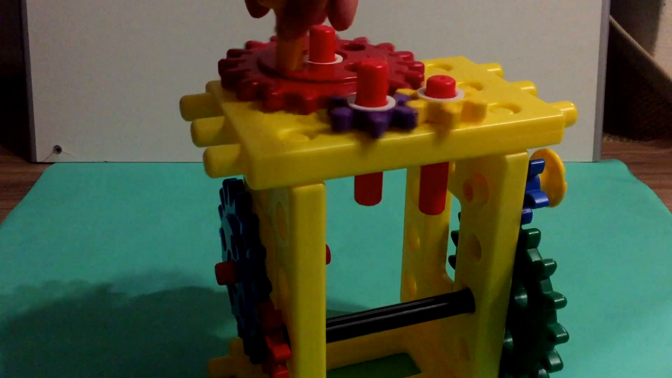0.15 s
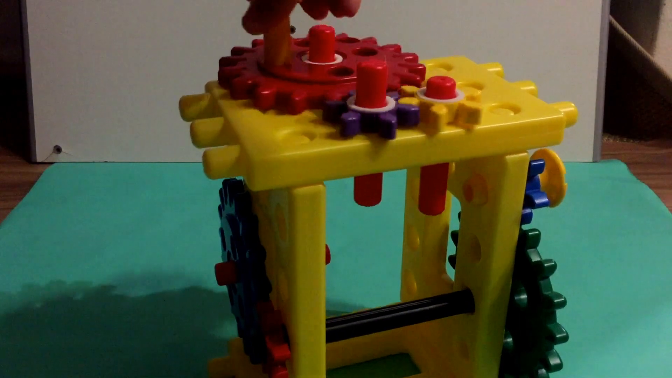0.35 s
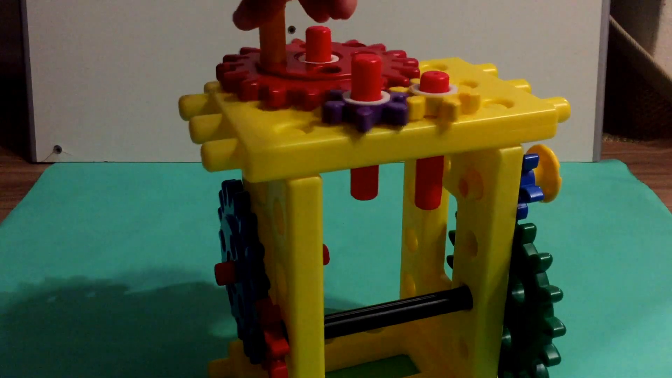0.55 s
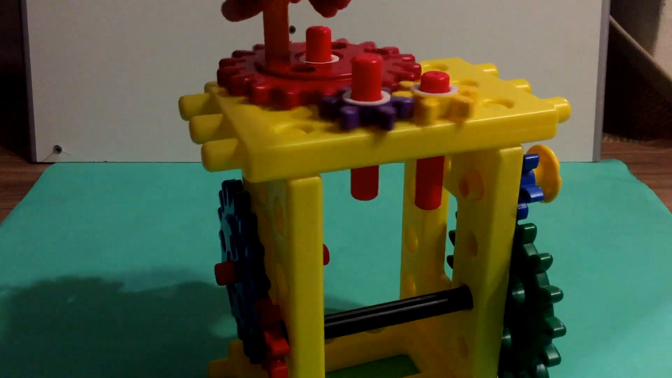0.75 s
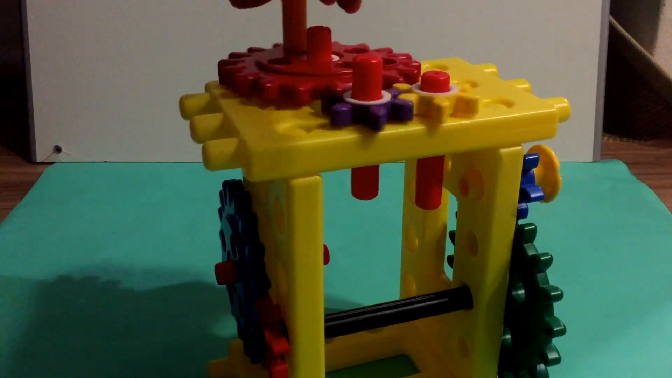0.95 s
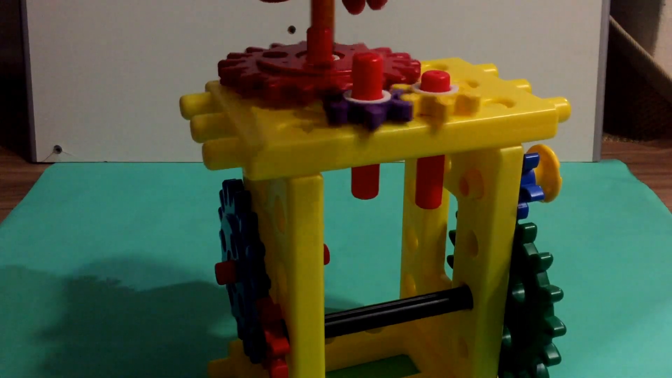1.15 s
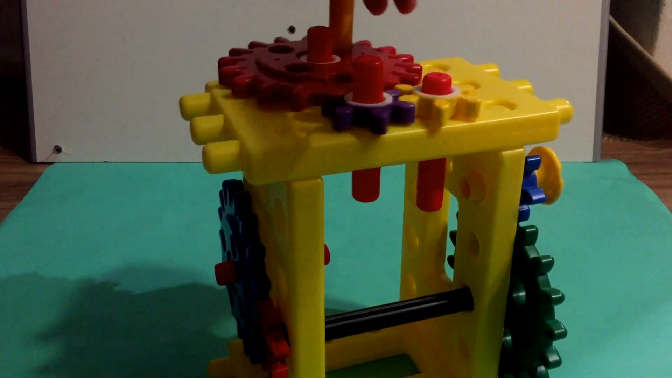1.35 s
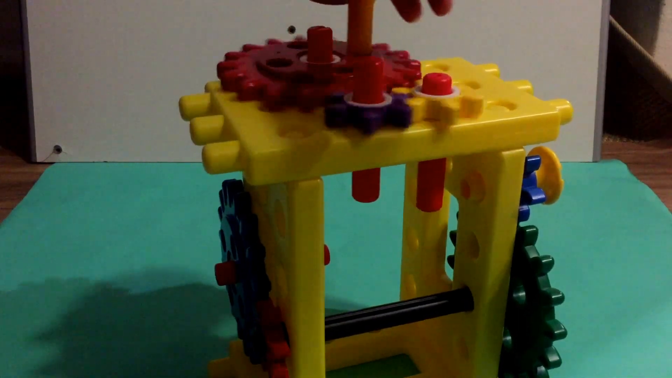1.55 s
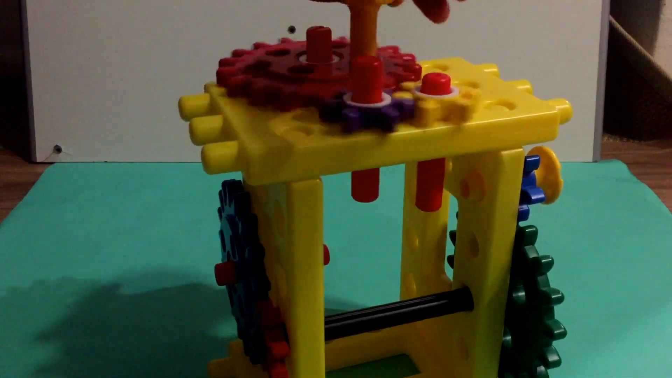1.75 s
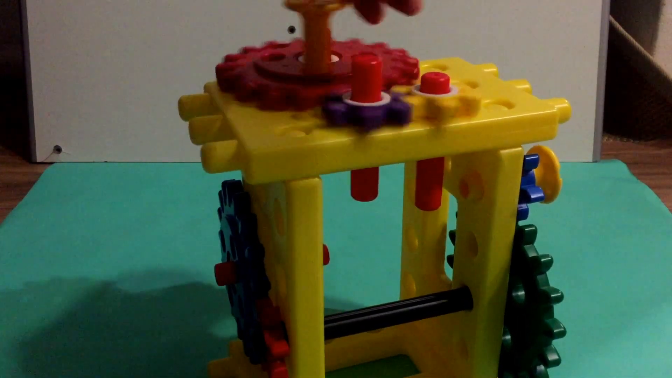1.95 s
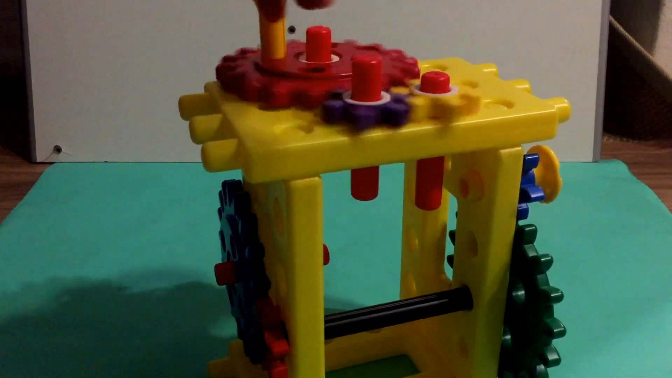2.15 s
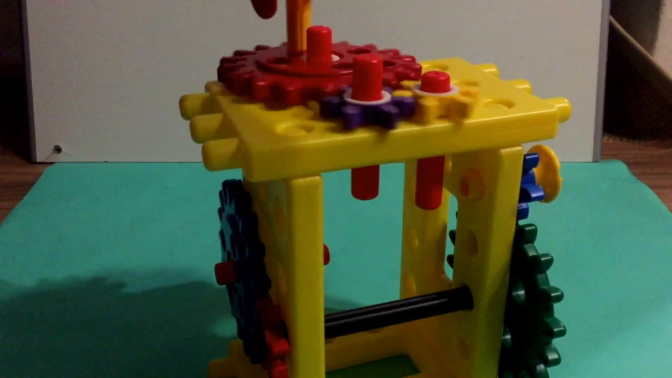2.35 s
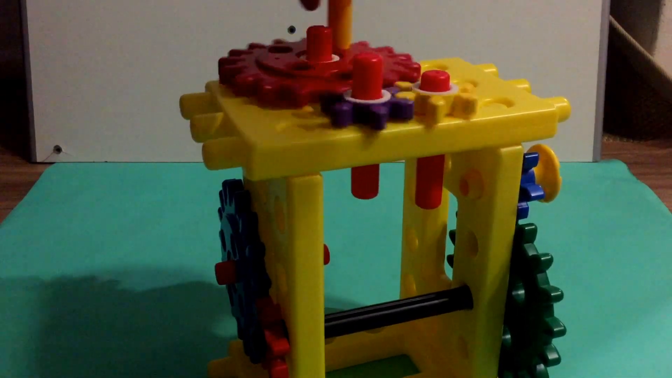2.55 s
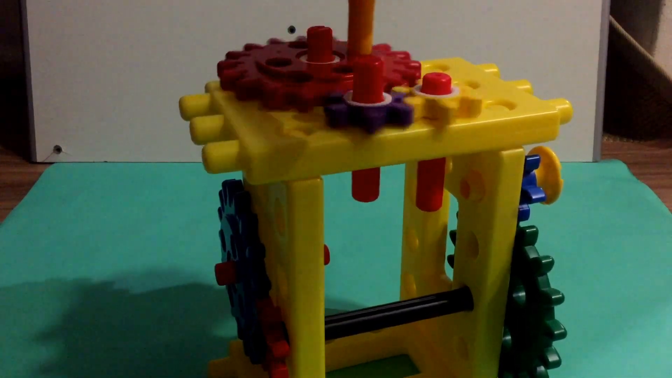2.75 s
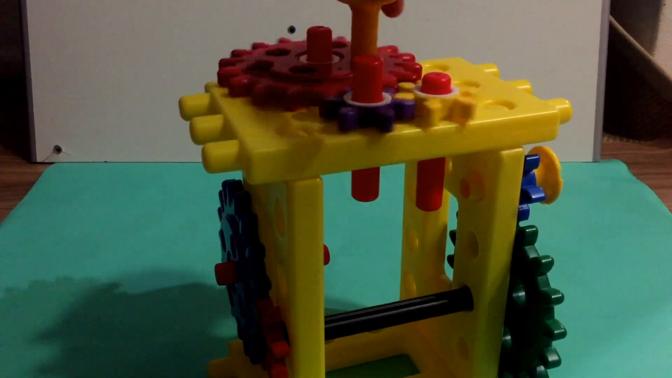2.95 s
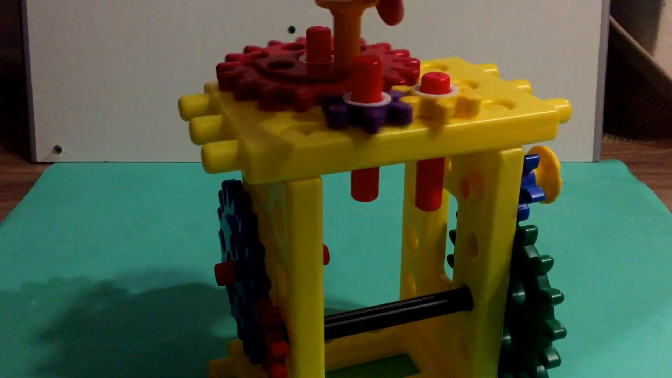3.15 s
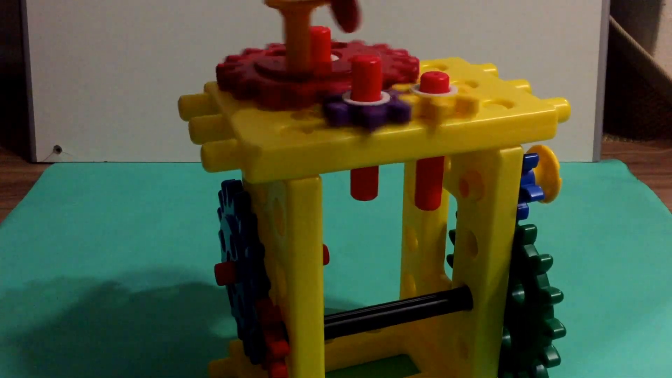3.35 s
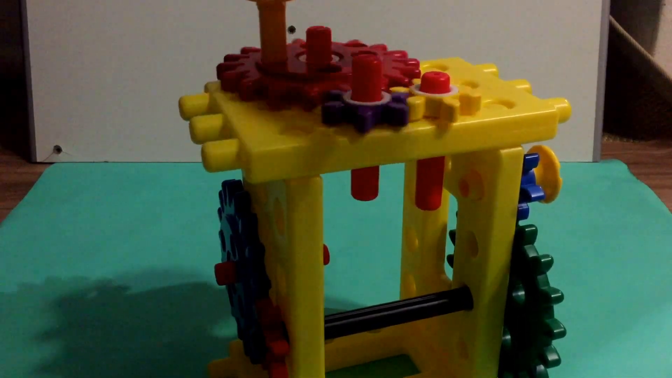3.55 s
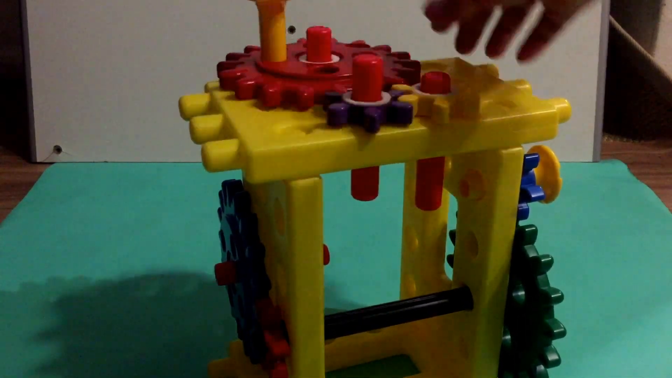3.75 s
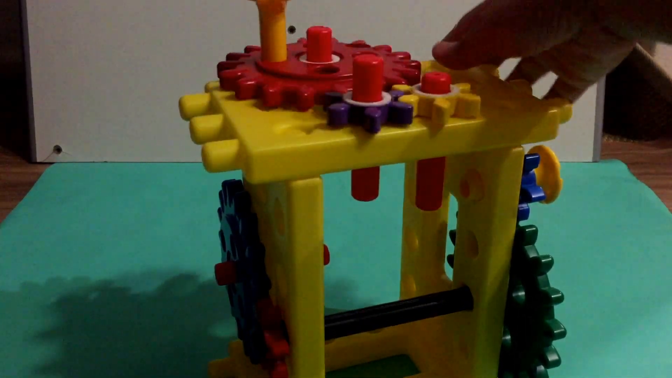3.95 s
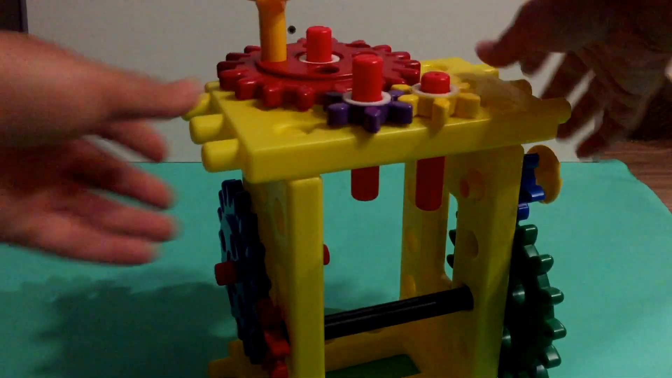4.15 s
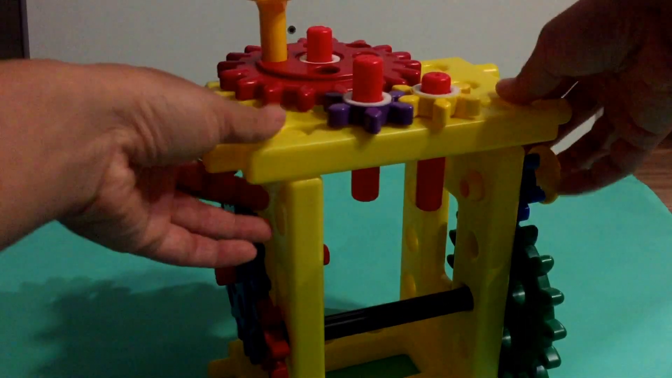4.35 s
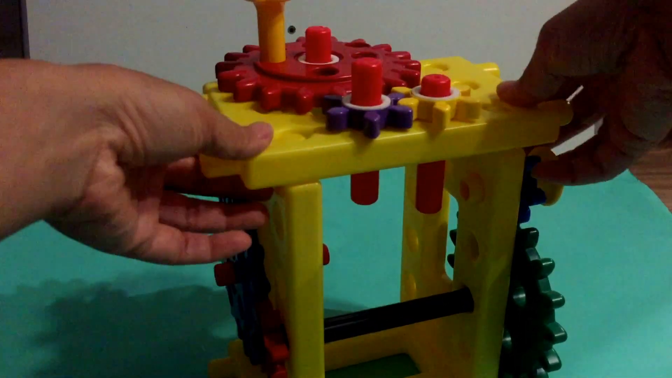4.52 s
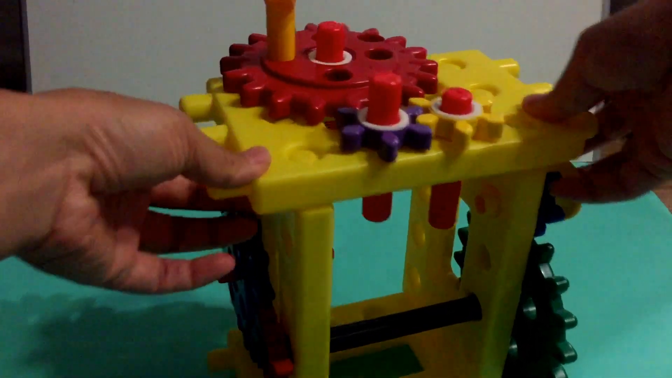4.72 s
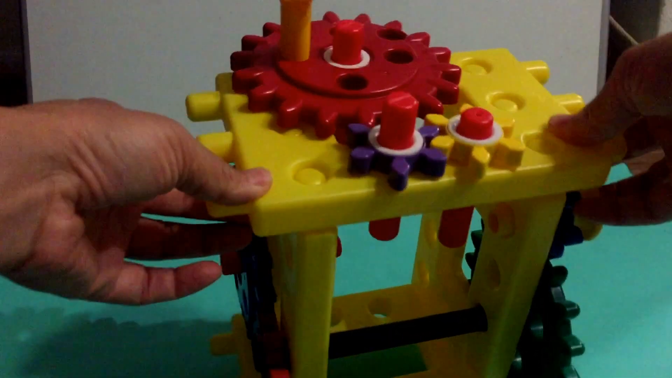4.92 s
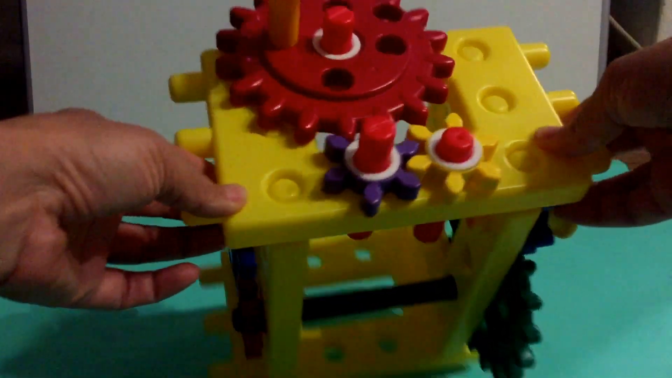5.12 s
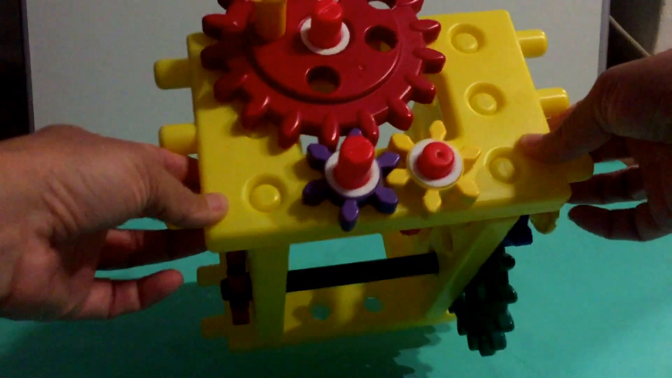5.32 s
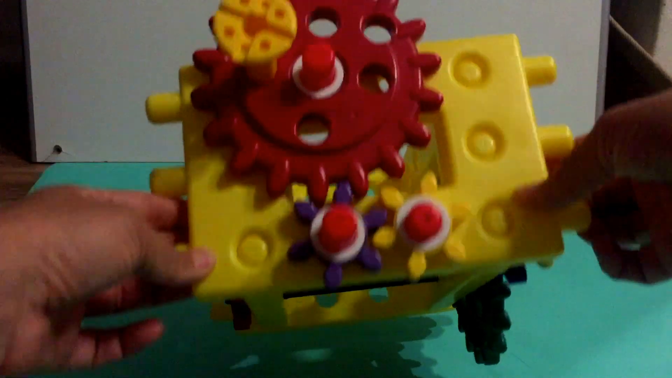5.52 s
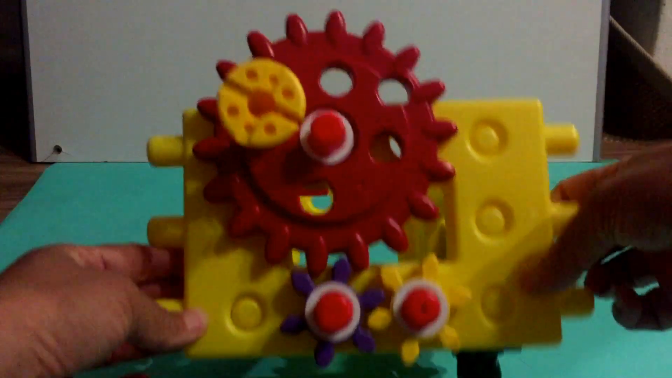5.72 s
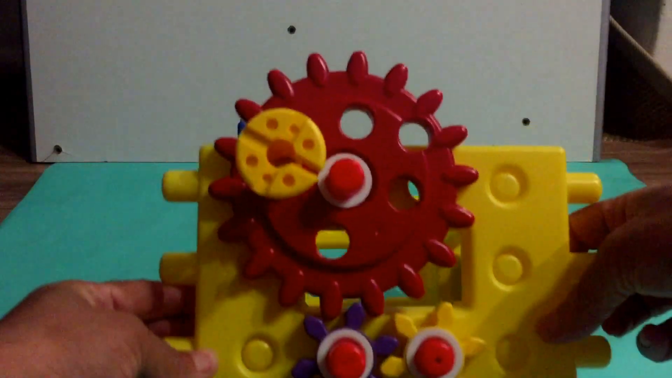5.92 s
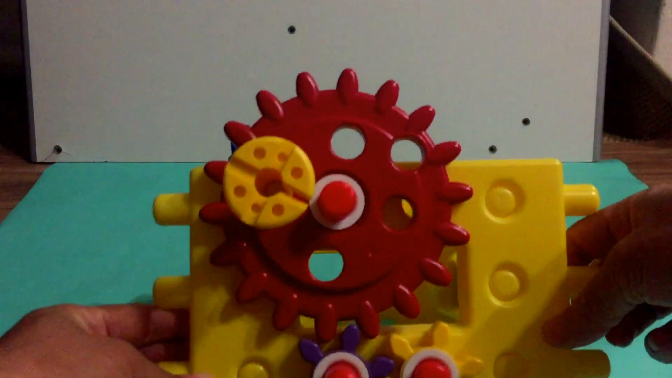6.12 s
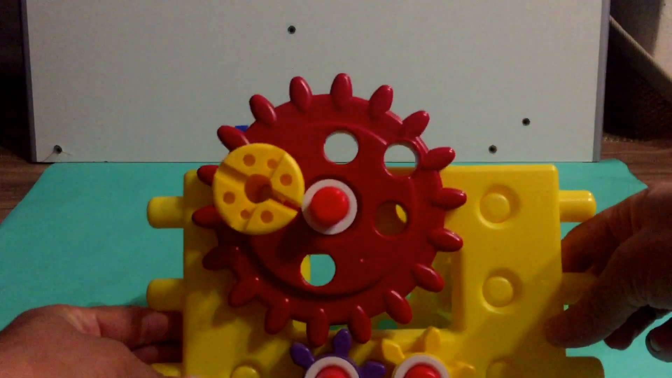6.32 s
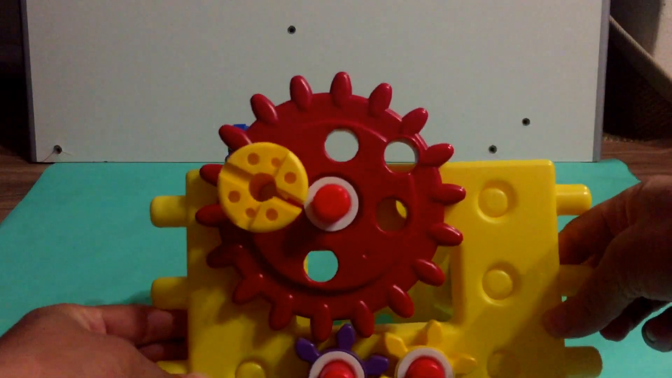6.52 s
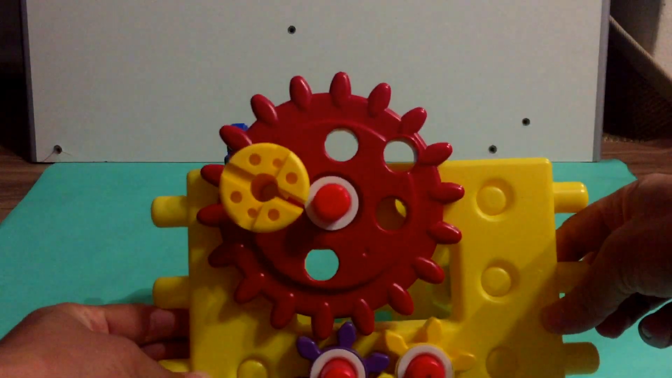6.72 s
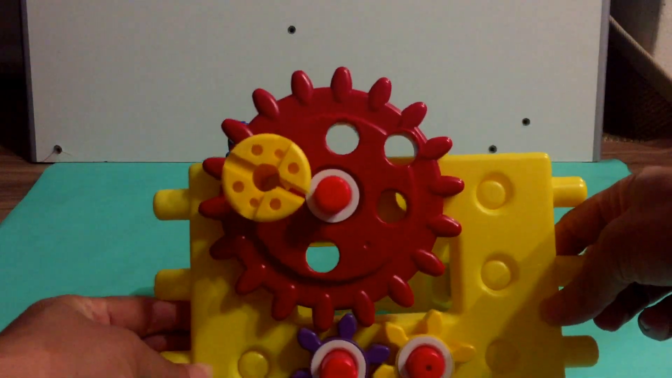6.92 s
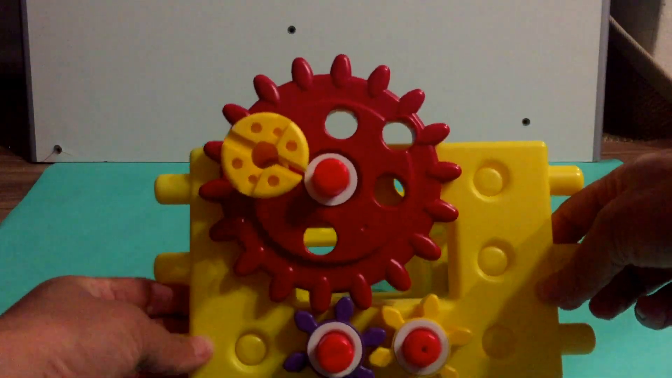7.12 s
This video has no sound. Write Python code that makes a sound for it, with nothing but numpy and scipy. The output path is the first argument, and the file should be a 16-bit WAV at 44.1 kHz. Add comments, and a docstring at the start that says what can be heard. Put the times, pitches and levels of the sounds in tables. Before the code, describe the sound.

Close, dry clatter of toy plastic gear teeth over scraping, growing busier for almost four seconds, then soft bumps and low far-off engine hum.

```python
"""Hand-cranked plastic gear tower

A hand cranks a tower of hollow plastic gears, lets go, then grips the frame and tips it forward.
Gear teeth and sliding parts send bursts of noise through the ringing pitches (modes) of the plastic.
Far outside, engines drone upward in pitch as near sine tones, with thin hisses gliding above them.
Filtered noise makes the quiet room, its murmurs, two brief faint tones and the low rumble of traffic."""
import sys
import numpy as np
from scipy import signal
from scipy.fft import rfft, irfft
from scipy.io import wavfile

SR = 44100
rng = np.random.default_rng(int(sys.argv[2]) if len(sys.argv) > 2 else 0)


def transcribe(u):
    """Save the signal u as a 16-bit wav file named by the first command-line argument.

    u: samples, shape (n,) or (channels, n), limited to [-1, 1]; the rate is SR.
    q: integer samples, one column per channel.
    """
    v = np.clip(np.atleast_2d(u).T, -1, 1)
    q = np.round(v * 32767).astype(np.int16)
    wavfile.write(sys.argv[1], SR, q)


N = 321048  # length in samples

# Knocks and short scrapes of the gear teeth, before the shared gain. Each row: time in seconds,
# strength in dB, extra for modes under 2.6 kHz in dB, extra for modes from 6 kHz up in dB.
TOOTH_CONTACTS = [(0.0421, -39, 9.5, -6), (0.1103, -38, 7, -1), (0.1662, -23.5, 2.5, -1),
                  (0.2148, -24.5, -3, -3), (0.2768, -26, 1, 7.5), (0.3207, -31, 9, -1),
                  (0.399, -27.5, 2, 0.5), (0.4883, -43, 13.5, 0), (0.6974, -40.5, 11.5, 5),
                  (0.762, -18.5, 2.5, 4), (0.8323, -29, 6.5, 4), (0.8555, -32.5, 4, -3),
                  (0.8804, -31.5, -15, -5), (0.961, -30, 5.5, 4), (0.9926, -16.5, -1, -3.5),
                  (1.057, -38, 15.5, -4), (1.08, -37, 4, 0), (1.1558, -38, 7, -8), (1.189, -26.5, 6, 2.5),
                  (1.222, -20, 4.5, -0.5), (1.2744, -28, 7, 4), (1.3198, -23.5, 8, 6),
                  (1.3445, -47, 21, -9), (1.3913, -40, 9, -7), (1.417, -40, 12, -3), (1.5148, -28, 5.5, -8),
                  (1.5912, -27, 1, 4.5), (1.6328, -10.5, 1.5, -0.5), (1.6564, -28, 1, 3),
                  (1.688, -24, 3, 4), (1.701, -23, -13, 2), (1.7194, -14, 2.5, 3), (1.7678, -19, -5, 5),
                  (1.8007, -21, 0, 2), (1.825, -26, -9, -14), (1.8478, -24, 4, 6.5), (1.8817, -28, -11, -3),
                  (1.9238, -20, -6, -3), (1.9477, -10.5, -1.5, 0.5), (1.9854, -17.5, -1.5, 0),
                  (2.0418, -14, -2.5, 3), (2.071, -30, -14, -1), (2.0886, -15, -2, 1.5),
                  (2.1038, -26, -3, 6), (2.131, -20.5, 2.5, 2.5), (2.152, -26, -14, 0),
                  (2.1724, -24.5, 1, 4), (2.1863, -25, -4, -1), (2.2313, -39, 11, 12),
                  (2.2678, -32.5, -12, 6), (2.3208, -28, -15, 2.5), (2.3717, -33.5, 8.5, 6),
                  (2.3923, -35.5, 0, 4), (2.4364, -27, 7, 5), (2.4708, -28, -1, -4), (2.4794, -17, -4, -2),
                  (2.5265, -27, -4, 4), (2.5804, -29.5, 9, 5.5), (2.633, -29, 9, -14),
                  (2.6937, -26.5, 5.5, 5), (2.7065, -18.5, -0.5, -4), (2.7817, -21, 4.5, 1.5),
                  (2.8167, -32, 4, 0), (2.887, -25, -5, 4), (2.9172, -20, 4.5, 3.5), (2.9649, -22.5, 1, 9),
                  (2.9809, -29.5, 2.5, 3), (2.9928, -11, -2.5, 5), (3.0484, -27.5, 9, 1),
                  (3.0871, -11.5, -2.5, 3), (3.1374, -30, -16, -5), (3.152, -28.5, -3, -1),
                  (3.1614, -28.5, 2, 9), (3.1745, -48, 4, 17), (3.2003, -10, -8, -0.5),
                  (3.2757, -21.5, 1.5, 1.5), (3.3026, -25, -23, -11), (3.3224, -25, 2, -10),
                  (3.366, -25, 4, 5.5), (3.3818, -20.5, -6, -7), (3.4345, -15.5, -4, -1.5),
                  (3.452, -27, -2, -1), (3.486, -25.5, 3.5, -1), (3.505, -29.5, 2, 5),
                  (3.5575, -51, 10, -3), (3.578, -26, 8, -4), (3.6017, -38, 15, 0), (3.6216, -16, -2, 4.5),
                  (3.6943, -49, 13, 5), (3.711, -33, 4, -6)]
# Axles and tooth flanks sliding. Each row: time in seconds, level in dB, brightness in dB,
# drumming of the frame in dB.
SLIDING_CURVE = [(0.0, -48, -28, -69), (0.139, -53.5, -34, -58.5), (0.2, -41.5, -12.5, -52),
                 (0.372, -45.5, -9.5, -56), (0.57, -53.5, -44, -70.5), (0.769, -46, -15.5, -56),
                 (1.149, -45.5, -18.5, -56.5), (1.31, -41.5, -16, -51), (1.42, -59.5, -19, -67),
                 (1.57, -46.5, -13, -56), (1.65, -42.5, -12.5, -50.5), (1.83, -42, -11.5, -50),
                 (1.97, -40.5, -7.5, -51), (2.15, -40, -13, -48), (2.45, -43.5, -17.5, -50.5),
                 (2.57, -37.5, -12, -51), (2.8, -47, -18, -55.5), (2.95, -39, -8, -49),
                 (3.15, -46, -9, -54), (3.581, -42, -14, -48), (3.71, -46.5, -17, -55),
                 (3.77, -97, -27, -70)]
# Modes of the plastic. Each row: pitch in Hz, width in Hz, relative level in dB.
PLASTIC_MODES = [(600, 204, -12.5), (907, 200, -11.5), (1155.5, 105, -2.5), (1352, 123, -11.5),
                 (1650, 230, -4), (1938, 106, -9.5), (2208, 177, -5), (2555, 175, -12.5), (2903, 175, -6.5),
                 (3196, 300, -12), (3620, 320, -6), (4078, 113, -7), (4412, 304, -3.5), (5240, 250, -17),
                 (5910, 280, -7.5), (5730, 800, -4), (6910, 850, -11.5), (8190, 700, -11.5),
                 (8700, 680, -12), (9520, 1600, -13), (11100, 640, -18), (11370, 1300, -18),
                 (12860, 430, -14), (12740, 360, -12), (13800, 870, -11.5), (15500, 320, -14.5)]
# Modes of the hollow frame. Each row: pitch in Hz, width in Hz, relative level in dB.
FRAME_MODES = [(323.5, 27, -6), (349, 39.3, 2.5), (390.4, 56, 0), (409.4, 190, -7.5)]
# Loose parts knocking as the frame is handled. Each row: time in seconds, strength in dB,
# favoured pitch in Hz, reach around it in octaves, rattle decay in seconds,
# strength of the snap in dB, pitch of the snap in Hz.
LOOSE_KNOCKS = [(4.404, -38, 2470, 0.11, 0.05, -65, 5000), (4.489, -66, 1900, .2, .02, -63, 5500),
                (5.09, -48.5, 2150, .3, 0.033, -74, 4500), (5.138, -43.5, 4100, 0.089, 0.0085, -62, 6000),
                (5.249, -32, 1050, 0.69, 0.0094, -51, 4500), (5.533, -46, 2096, 0.21, 0.011, -53, 4770),
                (5.693, -49.5, 2380, 0.18, 0.054, -74, 4000), (5.782, -44, 930, 0.21, 0.01, -62, 2600),
                (5.806, -51, 1920, 0.13, .015, -68, 3500), (5.82, -44, 1000, 0.2, .034, -58, 3280),
                (5.984, -50.5, 1290, 0.54, 0.0084, -66, 1900), (6.079, -37, 410, 0.13, 0.014, -49, 2820),
                (6.113, -38.5, 1710, 0.11, 0.016, -47, 3200), (6.116, -38, 410, 0.1, 0.032, -49.5, 6000),
                (6.582, -50, 859, 0.81, 0.017, -49.5, 4800), (7.18, -51, 2530, 0.17, 0.068, -68, 1900)]
# Fingers and feet of the frame brushing along. Each row: time of the peak in seconds,
# swell in seconds, dying away in seconds, peak level in dB, brightness in dB.
BRUSH_STROKES = [(3.8, .02, 0.31, -74.5, -0.5), (4.43, .04, 0.16, -66.5, -6),
                 (5.144, 0.13, 0.022, -62.5, -1.5), (5.84, 0.12, 0.068, -63.5, -12)]
# Engine drones, one list each. Each row: time in seconds, pitch in Hz, level in dB rms,
# level of the doubled pitch in dB rms.
ENGINE_DRONES = [
    [(0, 65, -56, -66), (.45, 72.6, -47, -87), (.8, 82.2, -51.5, -73), (1.03, 86, -57, -60.5),
     (1.3, 87, -61, -65), (1.75, 88, -69, -71.5)],
    [(0, 59, -41, -75), (.2, 54.8, -59, -90), (.85, 58.7, -53, -77), (1.25, 60.7, -55, -65),
     (1.6, 61, -64, -80), (1.95, 61.9, -43.5, -84), (2.15, 66.6, -55, -75), (2.45, 69.7, -45, -81),
     (2.9, 74.2, -51.5, -57.5), (3.36, 78.6, -55, -66), (3.48, 80.3, -65, -93), (3.7, 81.9, -57, -72),
     (4.2, 88.4, -71, -79.5)],
    [(2.9, 48.2, -71, -75), (3.15, 51, -57, -78), (3.62, 49.1, -63, -76), (4.1, 48.45, -74, -79),
     (4.25, 50.3, -59.5, -72), (4.55, 51.2, -54, -68.5), (4.68, 53.54, -80.5, -77), (5.05, 54.97, -55, -70),
     (5.33, 57.4, -64, -75), (5.48, 58.86, -50, -72), (5.62, 58.7, -75.5, -79), (6.0, 59.6, -49.5, -76),
     (6.22, 60.8, -53, -81), (6.51, 60.9, -43, -72), (7.0, 63.2, -55.5, -77.5), (7.28, 63.5, -49.5, -75)],
    [(5.3, 63.14, -65, -91), (5.6, 67.2, -59, -83), (5.9, 70.1, -65.5, -89.5), (6.15, 68.7, -57.5, -86)],
]
# Thin hisses that glide upward, one list each. Each row: time in seconds, pitch in Hz, level in dB rms.
HISS_GLIDES = [
    [(0, 12500, -68), (.25, 14000, -71), (.6, 16000, -82)],
    [(.5, 9100, -86), (1, 11020, -77), (1.35, 11900, -88)],
]
# Broad treble hiss under the glides. Each row: time in seconds, level in dB rms.
TREBLE_HISS = [(0, -69), (.5, -71.5), (1.0, -69.5), (1.6, -84)]
# Brief faint tones, one near 335 Hz sinking, one near 280 Hz rising, one list each.
# Each row: time in seconds, pitch in Hz, level in dB rms.
FAINT_TONES = [
    [(4.92, 338, -79), (4.986, 336, -64), (5.1, 331, -80.5)],
    [(6.4, 275, -79), (6.6, 277, -72.5), (6.85, 280, -78), (7.14, 288, -68.5), (7.28, 288, -83.5)],
]
# Pitches at which the room air murmurs. Each row: pitch in Hz, width in Hz, level in dB rms.
AIR_MURMURS = [(283.8, 34, -81), (336.7, 46, -84.5), (1193, 81, -85), (1970, 190, -88), (2660, 180, -88.5)]
# Tone colour of the room noise. Each row: pitch in Hz, relative level in dB per Hz.
ROOM_COLOUR = [(53, -26.5), (90, -7), (139, -8.5), (169, -1.5), (229, -10), (284, -15.5), (438, -22.5),
               (478, -25), (510, -21.5), (1070, -23), (1210, -21), (2270, -25.5), (2710, -25.5),
               (3430, -30), (16000, -43)]
# Low traffic rumble. Each row: time in seconds, level in dB.
TRAFFIC_LEVEL = [(0.0, -59), (1.3, -56), (1.6, -65), (3.65, -63.5), (3.85, -68), (7.28, -69)]

# Uneven strength from mode to mode
TOOTH_SPREAD_DB, KNOCK_SPREAD_DB = 3.2, 2
# Strength of the single clean blow compared with the noisy rattle
TOOTH_STRIKE_DB, KNOCK_STRIKE_DB = -12, -10
# Lighter ticks at random moments follow the strength of the sliding
TICKS_PER_S, TICK_OVER_SLIDING_DB, TICK_SPREAD_DB = 22, 2, 4.5
TICK_OVER_BRIGHTNESS_DB = 12.5
# Rubbing favours now one mode, now another, and rings them more narrowly
COLOUR_WANDER_DB, RUBBED_WIDTH_SHARE = 2.5, 0.88
HELD_WIDTH_SHARE = 0.8  # the modes also ring more narrowly once the gears stand still
SNAP_REACH, SNAP_S = 0.55, 0.012  # octaves, seconds
BRUSH_SWING_DB = 20  # rise over one swell time, and fall over one dying time
MURMUR_WAVER_DB = 2.5
ROOM_DB, DEEP_RUMBLE_DB = -72.5, -63.5
CUTOFF_HZ = 16800


def amp(db):
    """Turn decibels into a gain."""
    return 10 ** (np.asarray(db) / 20)


def rms_one(x):
    """Scale a sound to rms 1."""
    return x / np.sqrt(np.mean(x ** 2) + 1e-20)


def in_time(rows):
    """Stretch the columns of a table over all samples; add a soft gate that is open over its span."""
    s, *columns = np.transpose(rows)
    t = np.arange(N) / SR
    gate = np.clip(np.minimum(t - s[0] + .01, s[-1] - t + .01) / .02, 0, 1)
    return [np.interp(t, s, c) for c in columns] + [gate]


def drift(rate_hz):
    """Slow chance: noise smoothed twice by a one-pole low-pass, scaled to rms 1."""
    r = np.exp(-2 * np.pi * rate_hz / SR)
    noise = rng.standard_normal(N + SR)
    settled = signal.lfilter([1], [1, -2 * r, r * r], noise)[SR:]  # drop the first second
    return rms_one(settled)


def resonate(x, hz, width_hz):
    """A resonance passed twice, so that it leaks little to other pitches; gain 1 at its top."""
    r = np.exp(-1.55 * np.pi * width_hz / SR)  # 1.55 makes up for the narrowing by two passes
    section = [(1 - r * r) / 2, 0, (r * r - 1) / 2, 1, -2 * r * np.cos(2 * np.pi * hz / SR), r * r]
    return signal.sosfilt([section, section], x)


def fade(x, seconds):
    """Turn each impulse into an exponential decay that starts at its height."""
    return signal.lfilter([1], [1, -np.exp(-1 / (seconds * SR))], x + 1e-18)


def grains(per_s, spread_db):
    """Tiny contacts of uneven size at random moments, scaled to rms 1."""
    sizes = amp(spread_db * np.minimum(rng.exponential(1, N), 5))
    signs = rng.choice([-1, 1], N)
    present = rng.random(N) < per_s / SR
    return rms_one(sizes * signs * present)


def teeth(gain_db, chatter_s, tail_s, tail_db, spread_db):
    """Each contact chatters for some ms, rattles out more softly, and strikes every mode differently."""
    s, peak_db, low_db, high_db = np.vstack([TOOTH_CONTACTS, ticks()]).T
    at = np.round(s * SR).astype(int)
    luck = np.sqrt(3) * rng.uniform(-1, 1, (len(s), len(PLASTIC_MODES)))
    contact = grains(9000, spread_db=2.0)
    length = int(chatter_s * SR)
    out = np.zeros(N)
    for k, (hz, width_hz, db) in enumerate(PLASTIC_MODES):
        group_db = low_db if hz < 2600 else 0 if hz < 6000 else high_db
        blows = np.zeros(N)
        np.add.at(blows, at, amp(peak_db + group_db + db + gain_db + spread_db * luck[:, k]))
        held = np.cumsum(blows)
        held[length:] -= np.cumsum(blows)[:-length]  # the chatter holds, then stops
        slow = np.clip(1500 / hz, .1, 1) ** 0.79  # low modes start later and rattle longer
        rise_s = 0.00023 + 0.0029 * slow
        shape = held + amp(tail_db) * fade(blows, tail_s * slow ** 0.36)
        shape = fade(fade(shape, rise_s), rise_s) / (1 + rise_s * SR) ** 2
        # the clean blow lands in mid-chatter
        strike = np.roll(blows, length // 2) * amp(TOOTH_STRIKE_DB) * np.sqrt(SR / width_hz)
        force = shape * contact + strike
        out += (-1) ** k * resonate(force, hz, width_hz) * np.sqrt(SR / width_hz / 25)
    return out


def ticks():
    """Make rows like the tooth contacts for lighter ticks, at random moments while the gears turn."""
    s, level_db, bright_db, _ = np.transpose(SLIDING_CURVE)
    luck = rng.random((400, 4))
    at = np.cumsum(-np.log(1 - luck[:, 0]) / TICKS_PER_S)  # random waits between ticks
    peak_db = np.interp(at, s, level_db) + TICK_OVER_SLIDING_DB
    high_db = np.interp(at, s, bright_db) + TICK_OVER_BRIGHTNESS_DB
    rows = np.column_stack([at, peak_db, 0 * at, high_db])
    rows[:, 1:] += TICK_SPREAD_DB * np.sqrt(12) * (luck[:, 1:] - .5)
    return rows[at < s[-1]]


def sliding():
    """Dense uneven scuffs rub the plastic while the gears turn; the hollow frame drums below."""
    level_db, bright_db, frame_db, gate = in_time(SLIDING_CURVE)
    scuffs = grains(5000, spread_db=3.2) * amp(2.2 * drift(70))
    drum = sum(amp(db) * resonate(scuffs, hz, w) for hz, w, db in FRAME_MODES)
    rub = amp(level_db) * rubbed(scuffs, bright_db, COLOUR_WANDER_DB)
    return gate * (rub + amp(frame_db) * rms_one(drum))


def rubbed(source, tilt_db, wander_db=0):
    """Rubbing rings all plastic modes, rms 1 before the tilt, which sets in gradually above 2.8 kHz."""
    wander = wander_db * drift(5.2)
    plain, tilted = 0, 0
    for k, (hz, width_hz, db) in enumerate(PLASTIC_MODES):
        own_wander = np.roll(wander, k * N // len(PLASTIC_MODES))  # each mode wanders at another time
        ring = resonate(source, hz, width_hz * RUBBED_WIDTH_SHARE)
        ring = (-1) ** k * amp(db + own_wander) * ring
        share = np.interp(np.log(hz), np.log([2800, 5000, 15000]), [0, 1, 1.4])
        plain = plain + ring
        tilted = tilted + amp(share * tilt_db) * ring
    return tilted / np.std(plain)


def knocks(spread_db):
    """A short dying rattle rings mostly the modes near its favoured pitch, with a snap added."""
    snaps = [(s, snap_db, snap_hz, SNAP_REACH, SNAP_S) for s, *_, snap_db, snap_hz in LOOSE_KNOCKS]
    rattles = [row[:-2] for row in LOOSE_KNOCKS]
    s, peak_db, pitch_hz, reach, ring_s = np.transpose(rattles + snaps)
    modes = [(hz, w * HELD_WIDTH_SHARE, db) for hz, w, db in FRAME_MODES + PLASTIC_MODES]
    luck = rng.normal(0, 1, (len(s), len(modes)))
    age = np.maximum(np.arange(N)[None] / SR - s[:, None], -1e-9)  # seconds since each knock
    shapes = (age > 0) * np.exp(-age / ring_s[:, None])
    contact, out = rng.standard_normal(N), np.zeros(N)
    for k, (hz, width_hz, db) in enumerate(modes):
        near_db = np.maximum(-6 * (np.log2(hz / pitch_hz) / reach) ** 2, -40)
        strength = amp(peak_db + db / 2 + near_db + spread_db * luck[:, k])
        force = strength @ shapes * contact
        strike = strength * amp(KNOCK_STRIKE_DB) * np.sqrt(SR / width_hz)
        np.add.at(force, (s * SR).astype(int), strike)
        out += (-1) ** k * resonate(force, hz, width_hz) * np.sqrt(SR / width_hz / 100)
    return out


def brushes():
    """Soft rubbing while the frame is let go, gripped and tipped: each swells to its peak and dies."""
    noise, t = grains(4000, spread_db=2.5), np.arange(N) / SR
    out = 0
    for s, swell_s, dying_s, db, bright_db in BRUSH_STROKES:
        distance = np.maximum((s - t) / swell_s, (t - s) / dying_s)  # 0 at the peak
        out = out + amp(db - BRUSH_SWING_DB * distance) * rubbed(noise, bright_db)
    return out


def drones():
    """Each engine sounds its firing rate and the double of it as near sines."""
    out = 0
    for rows in ENGINE_DRONES:
        hz, db, double_db, gate = in_time(rows)
        phase = 2 * np.pi * (np.cumsum(hz) / SR + rng.random())
        tones = amp(db) * np.sin(phase) + amp(double_db) * np.sin(2 * phase)
        out = out + np.sqrt(2) * gate * tones
    return out


def glides(table, width_hz):
    """Slow noise multiplies a moving tone, which makes a narrow band of noise around its pitch."""
    out = 0
    for rows in table:
        hz, db, gate = in_time(rows)
        phase = 2 * np.pi * np.cumsum(hz) / SR
        band = drift(width_hz) * np.sin(phase) + drift(width_hz) * np.cos(phase)
        out = out + gate * amp(db) * band
    return out


def hiss():
    """Smooth noise above 6 kHz that dies away with the glides."""
    db, gate = in_time(TREBLE_HISS)
    high_pass = signal.butter(2, 6000.0, "high", fs=SR, output="sos")
    return gate * amp(db) * rms_one(signal.sosfilt(high_pass, rng.standard_normal(N)))


def murmurs(waver_db):
    """Narrow bands of noise in the room air, each swelling and sinking on its own."""
    noise = rng.standard_normal(N)
    return sum(amp(db + waver_db * drift(3)) * rms_one(resonate(noise, hz, w))
               for hz, w, db in AIR_MURMURS)


def room():
    """Steady room air, a rumble under 250 Hz that swells with the traffic, and the lowest street noise."""
    hz = np.maximum(np.fft.rfftfreq(N, 1 / SR), 1)
    points = np.array(ROOM_COLOUR)
    colour_db = np.interp(np.log(hz), np.log(points[:, 0]), points[:, 1])
    colour = amp(colour_db) * rfft(rng.standard_normal(N))
    low_share = 1 / (1 + (hz / 250) ** 8)
    traffic_db, _ = in_time(TRAFFIC_LEVEL)
    rumble = amp(traffic_db + 2.34 * drift(7.5)) * rms_one(irfft(colour * low_share, N))
    air = amp(ROOM_DB + .4 * drift(3)) * rms_one(irfft(colour * (1 - low_share), N))
    deep_noise = resonate(rng.standard_normal(N), hz=54.3, width_hz=20)
    deep = amp(DEEP_RUMBLE_DB + 3 * drift(3.3)) * rms_one(deep_noise)
    return air + rumble + deep


def scene():
    """Add up all sources at one microphone."""
    contacts = teeth(gain_db=-10.0, chatter_s=0.0031, tail_s=0.023, tail_db=-9.5,
                     spread_db=TOOTH_SPREAD_DB)
    gears = contacts + sliding()
    handling = knocks(KNOCK_SPREAD_DB) + brushes()
    engines = drones() + hiss() + glides(HISS_GLIDES, width_hz=380)
    faint_tones = glides(FAINT_TONES, width_hz=5)
    return (gears + handling + engines + faint_tones + room() + murmurs(MURMUR_WAVER_DB))[None]


def record(dry):
    """A shallow dip near 10 kHz; the treble thins above 16 kHz and ends near 17 kHz."""
    dipped = dry - 0.16 * resonate(dry, hz=10470, width_hz=1000)
    dulled = signal.sosfilt(signal.cheby2(8, 20, 16050, fs=SR, output="sos"), dipped)
    return signal.sosfilt(signal.cheby2(12, 70, CUTOFF_HZ, fs=SR, output="sos"), dulled)


dry = scene()
out = record(dry)
transcribe(out)
```